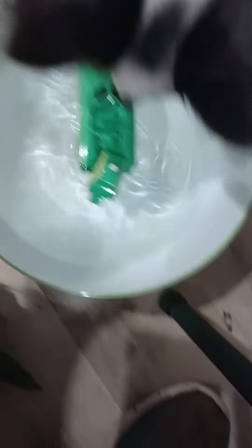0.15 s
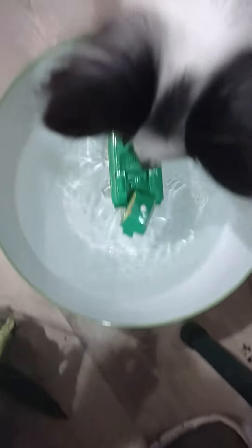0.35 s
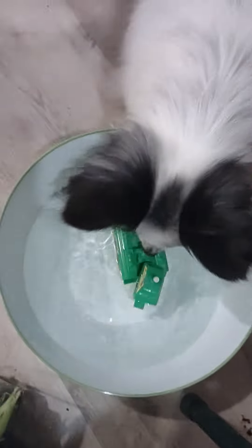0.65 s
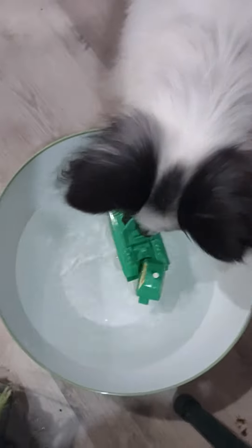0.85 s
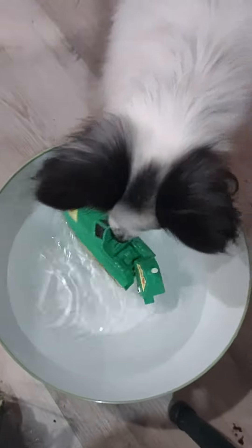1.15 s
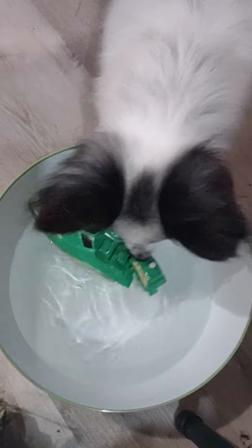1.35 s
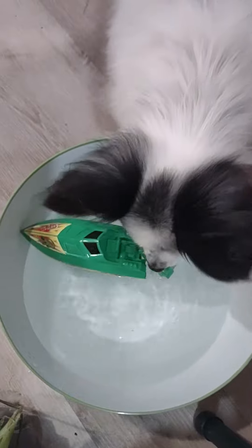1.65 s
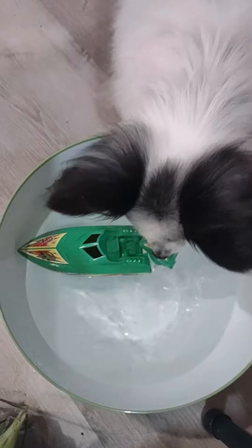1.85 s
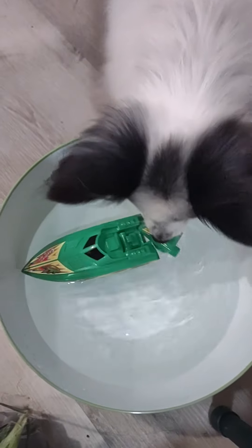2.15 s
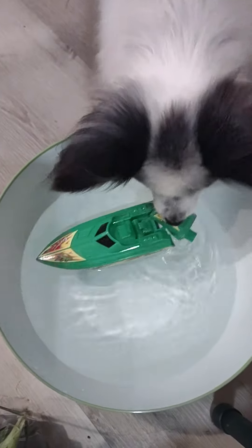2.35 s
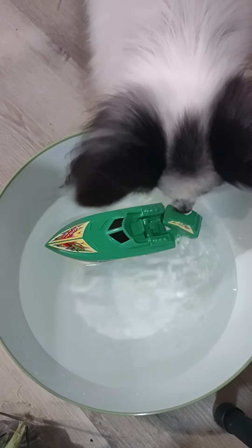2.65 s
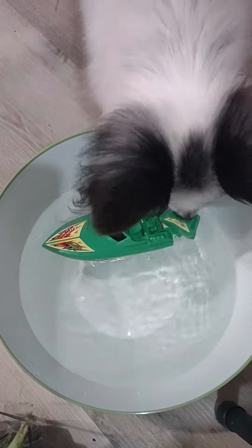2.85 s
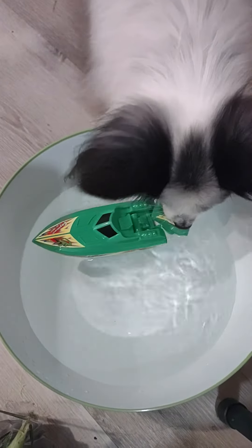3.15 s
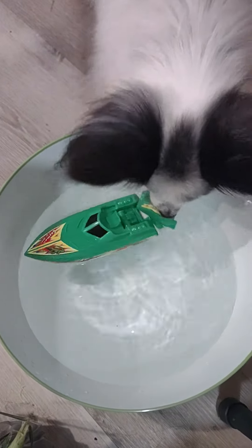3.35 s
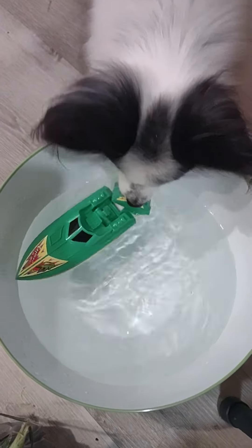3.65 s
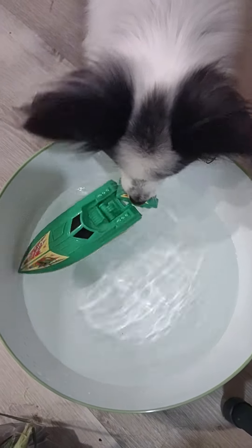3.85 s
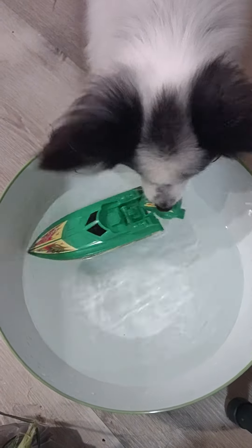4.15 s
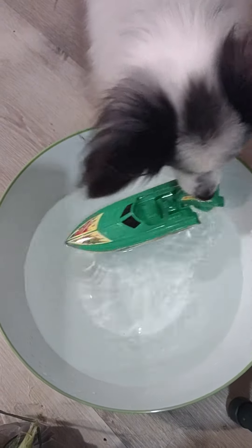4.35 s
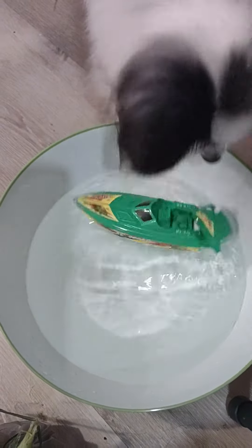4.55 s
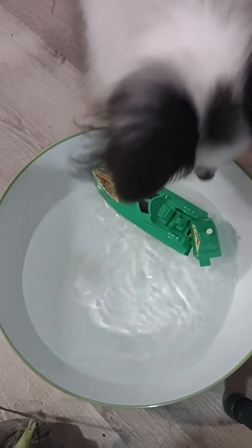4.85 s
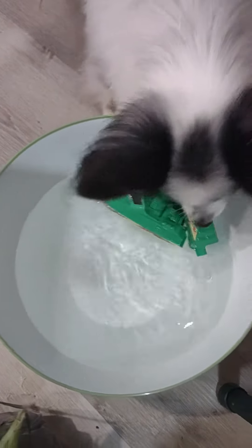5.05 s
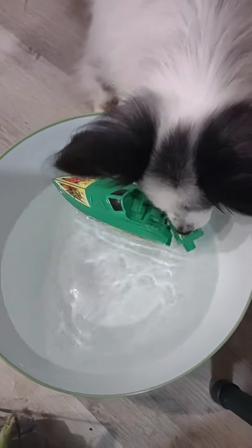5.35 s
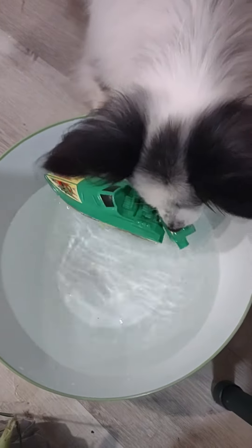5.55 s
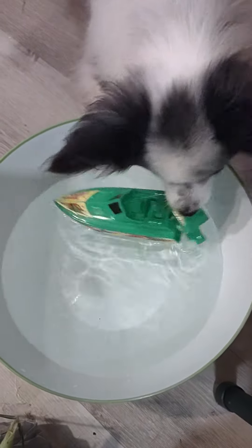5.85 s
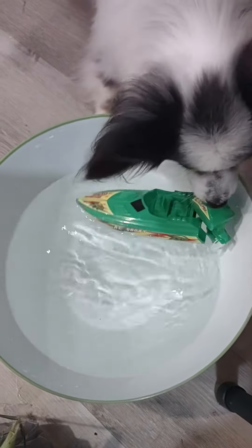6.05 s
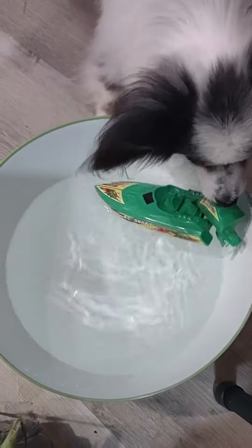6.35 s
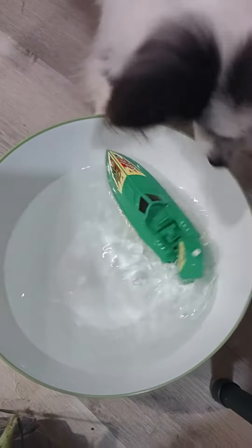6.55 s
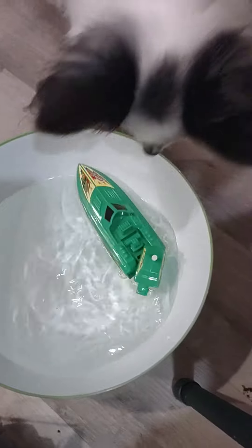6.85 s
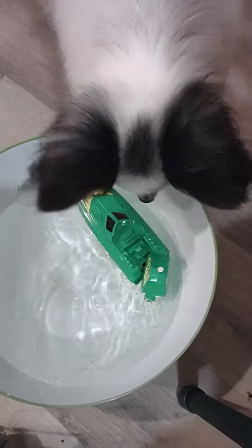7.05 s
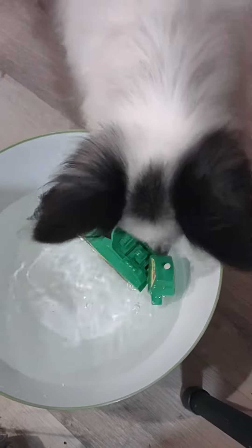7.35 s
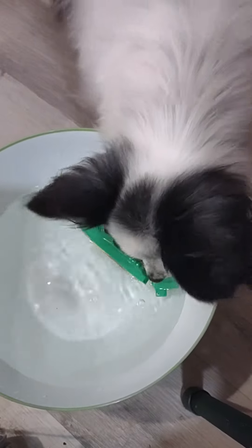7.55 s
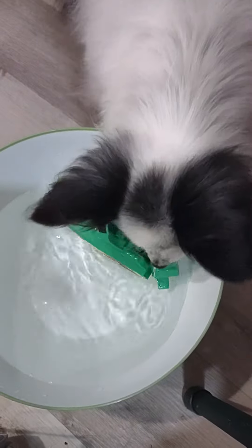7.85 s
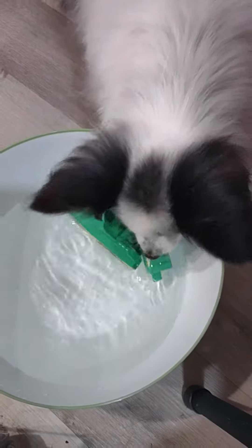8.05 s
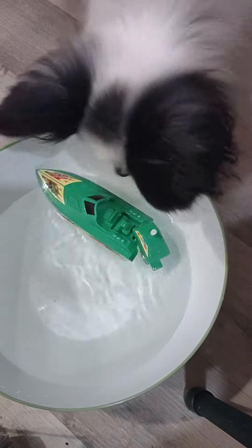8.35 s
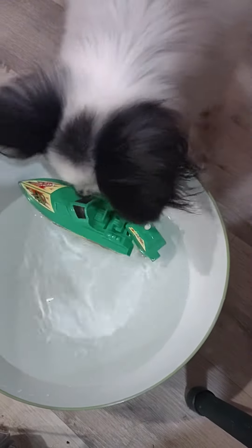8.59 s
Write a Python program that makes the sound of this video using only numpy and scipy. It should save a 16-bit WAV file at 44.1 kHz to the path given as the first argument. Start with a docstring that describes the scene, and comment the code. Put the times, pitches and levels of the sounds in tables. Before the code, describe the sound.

A wind-up plastic toy boat whirs and rattles in a bowl of water, its gears slowing under a puppy's mouth, after early microphone bumps.

```python
"""Touches brush and bump a microphone in the first seconds, over the whir of a wind-up plastic boat in a bowl indoors.
A puppy noses the boat and stalls the clockwork now and then: its gear ticks slow down and lose level.
Ticks and noise drive gear, gearbox and hull resonances; knocks of hull on bowl ring the same hull modes.
Plips and two short hull rings are sines rising in pitch; two faint ticks and a brief squeak are wavering tones.
Loud gear ticks and releases are noise rasps; brushing, hand rumble, a brief hiss and the floor are filtered noise."""
import sys
import numpy as np
from scipy import signal
from scipy.fft import rfft, irfft
from scipy.io import wavfile
from scipy.ndimage import uniform_filter1d

SR = 44100
rng = np.random.default_rng(int(sys.argv[2]) if len(sys.argv) > 2 else 0)


def digitize_waveform(pressure):
    """Quantize a signal to 16-bit integers and store it at the path in sys.argv[1].

    Rows of a 2-D input are taken as channels; values are limited to [-1, 1].
    """
    field = np.atleast_2d(pressure).T
    bounded = np.clip(field, -1, 1)
    quanta = np.round(bounded * 32767).astype(np.int16)
    wavfile.write(sys.argv[1], SR, quanta)


N = 384552
TIME = np.arange(N) / SR

# Hull modes. Each row: frequency in Hz, relative level in dB, t60 in s.
HULL = [(353, -10.5, 0.15), (387.8, -11.5, 0.12), (566.5, -10.5, 0.038), (686, -7.5, 0.022),
        (805, -7.5, 0.036), (928, -3, 0.041), (1008, -2, 0.036), (1114, -5.5, 0.07), (1457, -16, 0.05),
        (1620, -28, 0.21), (2010, -21, 0.069), (2674, -2, 0.0048), (3242, -0.5, 0.035), (3677, -5.5, 0.049)]


def from_db(db):
    """Decibels to gain."""
    return 10 ** (np.asarray(db) / 20)


def rms_one(x):
    """Scale to unit rms."""
    return x / np.sqrt(np.mean(x ** 2) + 1e-20)


def noise(size=N):
    """White Gaussian noise of unit spread."""
    return rng.standard_normal(size)


def in_time(rows):
    """Interpolate each column of a curve to one value per sample."""
    s, *columns = np.transpose(rows)
    return [np.interp(TIME, s, column) for column in columns]


def drift(knots_per_s):
    """Random curve of unit rms, linear between knots."""
    knots = noise(N // 100)
    return rms_one(np.interp(TIME * knots_per_s, np.arange(len(knots)), knots))


def swell_at(s, length_s):
    """Cosine-squared rise and fall of height 1, centred on time s."""
    return np.cos(np.pi * np.clip((TIME - s) / length_s, -.5, .5)) ** 2


def decay(t, t60_s):
    """Exponential fall by 60 dB in t60_s."""
    return np.exp(-np.log(1000) * t / t60_s)


def cut(x, hz, kind, order=2):
    """Butterworth filter."""
    return signal.sosfilt(signal.butter(order, hz, kind, fs=SR, output="sos"), x + 1e-18)


def colour(x, spectrum):
    """Minimum-phase filter with the given spectrum, built by folding the cepstrum."""
    hz, db = np.transpose(spectrum)
    size = 2048
    grid_hz = np.maximum(np.fft.rfftfreq(size, 1 / SR), 1)
    grid_db = np.interp(np.log(grid_hz), np.log(hz), db)
    cepstrum = irfft(np.log(from_db(grid_db)))
    cepstrum[1:size // 2] *= 2
    cepstrum[size // 2 + 1:] = 0
    impulse = irfft(np.exp(rfft(cepstrum)))
    return signal.oaconvolve(x, impulse)[:N]


def ring(x, hz, t60_s):
    """Two-pole resonator: a unit click starts a decaying sine of height 1."""
    radius = from_db(-60 / (t60_s * SR))
    angle = 2 * np.pi * hz / SR
    return signal.lfilter([0, np.sin(angle)], [1, -2 * radius * np.cos(angle), radius * radius], x + 1e-18)


def die_away(x, t60_s):
    """One-pole decay: each click becomes a falling envelope."""
    return signal.lfilter([1], [1, -from_db(-60 / (t60_s * SR))], x + 1e-18)


def clicks_at(s, sizes):
    """Single-sample clicks at the given times."""
    out = np.zeros(N)
    np.add.at(out, np.round(np.asarray(s) * SR).astype(int), sizes)
    return out


def add(out, s, sound):
    """Mix a short sound in at time s."""
    start = round(s * SR)
    out[start:start + len(sound)] += sound[:N - start]


def room_floor():
    """Steady indoor background: noise shaped to a falling spectrum."""
    # Floor spectrum. Each row: frequency in Hz, relative density in dB per Hz.
    floor_spectrum = [(15, -49.5), (25, -14.5), (179, -7), (371, -15), (439, -6.5), (560, -20.5),
                      (633, -12), (847, -22), (1080, -12.5), (1340, -39), (2240, -26), (8310, -37),
                      (10800, -77.5), (18300, -120)]
    level_db = -67
    return from_db(level_db) * rms_one(colour(noise(), floor_spectrum))


def hiss():
    """Short, smooth swell of shaped noise."""
    # Hiss spectrum. Each row: frequency in Hz, relative density in dB per Hz.
    hiss_spectrum = [(1400, -28), (2300, 2), (3000, 1.5), (4000, -3.5), (8000, -4.5)]
    centre_s, length_s, level_db = 3.25, 0.56, -46
    return from_db(level_db) * swell_at(centre_s, length_s) * rms_one(colour(noise(), hiss_spectrum))


def brushing(lumpy_db=4.0, spread=1.96, dull_hz=1285.0):
    """Dull, lumpy strokes of friction close to the microphone, over the rumble of the moving hand."""
    # Hand movements. Each row: middle in seconds, length in s, level in dB.
    hand_moves = [(0.092, 3.3, -61.5), (1.437, 2.38, -54), (2.877, 3.1, -67.5), (5.064, 0.6, -65),
                  (6.748, 0.51, -62.5)]
    # Rumble spectrum. Each row: frequency in Hz, relative density in dB per Hz.
    rumble_spectrum = [(15, -23.5), (30, -13.5), (80, -5.5), (180, -11.5), (500, -18.5), (1500, -30.5)]
    # Strokes. Each row: middle in seconds, length in s, level in dB before the fade, centre in Hz.
    strokes = [(0.132, 0.24, -55, 304), (0.615, 0.12, -47, 377), (0.764, 0.11, -41.5, 617),
               (0.81, 0.24, -54.5, 283), (0.877, 0.059, -44, 507), (0.986, 0.15, -52.5, 410),
               (1.289, 0.22, -49.5, 356), (1.602, 0.14, -52, 750), (1.868, 0.13, -44.5, 1270),
               (2.045, 0.017, -41, 900), (2.085, 0.25, -45, 580), (2.285, 0.45, -56, 500),
               (2.513, 0.05, -50.5, 637)]
    moving = sum(from_db(db) * swell_at(s, length_s) for s, length_s, db in hand_moves)
    out = moving * rms_one(colour(noise(), rumble_spectrum))
    grain = cut(noise() * from_db(lumpy_db * drift(160)), dull_hz, "low", order=3)
    for s, length_s, db, hz in strokes:
        start = max(round((s - length_s / 2) * SR), 0)
        size = int(length_s * SR)
        stroke = rms_one(cut(grain[start:start + size], [hz / spread, hz * spread], "band"))
        add(out, start / SR, from_db(db) * np.hanning(size) * stroke)
    return out


def bumps():
    """A touch on the microphone: round pop with a sharper tip, scuff and crack around it, low thud after it."""
    # Touches. Each row: time in seconds, overall gain in dB, pop frequency in Hz.
    touches = [(0.113, -44, 576), (0.124, -36, 355), (0.513, -33.5, 260), (0.65, -31, 435),
               (0.692, -36, 990), (0.773, -21.5, 442), (0.881, -25.5, 390), (0.9125, -12.5, 375),
               (0.990, -27, 590), (1.17, -33, 490), (1.235, -38, 294), (1.25, -29.5, 400),
               (1.269, -31, 397), (1.517, -25.5, 526), (1.629, -17, 577), (1.799, -25.5, 930),
               (1.82, -22, 860), (1.841, -32, 750), (1.855, -15.5, 670), (1.880, -11.5, 800),
               (2.0504, -21, 670), (2.058, -22, 490), (2.1029, -3, 420), (2.141, -22, 510),
               (2.511, -37, 400)]
    pop_width_cycles, pop_db = 0.4, -3.5
    tip_ratio, tip_db = 2.17, -12.5
    thud_delay_s, thud_hz, thud_t60_s = 0.00553, 94.0, 0.022
    boom_hz, boom_t60_s, boom_db = 164.0, 0.014, -4.0
    soft_pop_hz = 441
    # levels at or below soft_pop_hz, then change per octave above it
    thud_db, thud_db_per_octave = -2.5, -31
    scuff_db, scuff_db_per_octave = -21.5, 6
    crack_db, crack_db_per_octave = -31.5, 17.5

    out, lead_s = np.zeros(N), .02
    t = TIME[:SR // 5] - lead_s
    strike = -clicks_at([lead_s + thud_delay_s], [1])[:len(t)]
    thud = ring(strike, thud_hz, thud_t60_s) - from_db(boom_db) * ring(strike, boom_hz, boom_t60_s)
    for s, touch_db, hz in touches:
        octaves = max(np.log2(hz / soft_pop_hz), 0)
        tip_hz = hz * tip_ratio
        pop = np.exp(-(t * hz / pop_width_cycles) ** 2) * np.cos(2 * np.pi * hz * t)
        tip = np.exp(-(t * tip_hz / pop_width_cycles) ** 2) * np.sin(2 * np.pi * tip_hz * t)
        scuff_noise = rms_one(cut(noise(len(t)), [hz / 2, hz * 1.24], "band", order=3))
        scuff = np.exp(-abs(t) / 0.0038) * scuff_noise
        crack_noise = rms_one(cut(noise(len(t)), [1800, 3800], "band", order=1))
        crack = np.exp(-abs(t) / 0.0011) * crack_noise
        touch = from_db(pop_db) * pop + from_db(tip_db) * tip
        touch += from_db(scuff_db + scuff_db_per_octave * octaves) * scuff
        touch += from_db(thud_db + thud_db_per_octave * octaves) * thud
        touch += from_db(crack_db + crack_db_per_octave * octaves) * crack
        add(out, s - lead_s, from_db(touch_db) * touch)
    return cut(out, 68, "high")


def wavering_tones(waver=0.04):
    """Short wavering tones with their octave: two faint ticks, then a brief squeak."""
    # Tones. Each row: start in seconds, length in s, level in dB, mean frequency in Hz.
    tones = [(0.2, 0.021, -51, 2120), (1.151, 0.013, -51.5, 2090), (6.58, 0.0065, -48, 4350),
             (6.582, 0.022, -58, 2520), (6.594, 0.013, -60, 4160)]
    out = np.zeros(N)
    for s, length_s, db, hz in tones:
        size = int(length_s * SR)
        phase = 2 * np.pi * np.cumsum(hz * (1 + waver * drift(250)[:size])) / SR
        tone = np.sin(phase) + .5 * np.sin(2 * phase)
        add(out, s, from_db(db) * np.hanning(size) * tone)
    return out


def plips_and_rings(t60_s=0.068, attack_s=0.0053, rise_per_s=2.4, churn_db=-75.5, count=130):
    """Sines rising in pitch: water plips, two short hull rings, many small bubbles stirred by the screw."""
    # Plips, and two short hull rings near 340 Hz (the last two rows). Each row: start in seconds,
    # level in dB before the envelope, starting frequency in Hz.
    plips = [(3.085, -40.5, 316), (3.265, -44.5, 212.1), (3.385, -39, 357), (5.195, -43, 355),
             (6.606, -42.5, 663), (8.085, -45, 342.2), (8.16, -41, 329.6)]
    out, t = np.zeros(N), TIME[:SR // 5]
    stirring = from_db(-braking())
    tones = list(plips)
    for when, strength, pitch in rng.random((count, 3)):
        if stirring[int(when * N)] > .5:   # no small bubbles while the screw is held
            tones.append((when * TIME[-1], churn_db + 16.4 * strength, 300.0 * 3.5 ** pitch))
    envelope = (1 - np.exp(-t / attack_s)) * decay(t, t60_s)
    for s, db, hz in tones:
        add(out, s, from_db(db) * envelope * np.sin(2 * np.pi * hz * t * (1 + rise_per_s * t)))
    return out


def knocks():
    """Hull against bowl: each knock cracks, clacks at its own pitch, chatters and rings the hull modes."""
    # Knocks. Each row: start in seconds, knock level in dB, low hull ring in dB (depends on where it
    # is hit), clack in Hz. Levels are ahead of the part gains below.
    blows_on_bowl = [(0.293, -29, -21, 907), (2.647, -40, -25, 697), (3.367, -36, -30, 954),
                     (3.697, -39.5, -32, 949.3), (4.053, -38.5, -32, 900), (4.543, -28.5, -22, 900),
                     (4.8942, -18.5, -15.5, 928.4), (5.166, -40.5, -40, 745), (5.516, -39, -33, 860),
                     (5.732, -28.5, -30.5, 800.5), (6.036, -32.5, -34.5, 916), (6.138, -38.5, -43, 960),
                     (6.478, -41.5, -41, 890), (6.647, -38, -43, 712), (6.7688, -21, -20, 945),
                     (7.83, -39, -38, 902.2), (7.971, -39, -33, 906), (8.06, -38, -28.5, 900),
                     (8.255, -30, -31, 861.4)]
    ring_db, low_ring_top_hz = -10.0, 450
    chatter, chatter_t60_s = 0.043, 0.1
    clack_db, clack_t60_s, clack_spread = -13.0, 0.048, 1.3
    crack_db, crack_t60_s = -10.5, 0.095
    crack_growth = 1.43   # dB of crack per dB of knock: harder is brighter

    s, body_db, low_db, clack_hz = np.transpose(blows_on_bowl)
    chatter_noise = chatter * noise()
    out = 0
    for k, (hz, db, t60_s) in enumerate(HULL):
        blow_db = low_db if hz < low_ring_top_hz else body_db
        blows = clicks_at(s, from_db(blow_db + rng.normal(0, 1.0, len(s))))
        drive = blows + chatter_noise * die_away(blows, chatter_t60_s)
        out = out + (-1) ** k * from_db(db + ring_db) * ring(drive, hz, t60_s)
    out = cut(out, [330, 1800], "band", order=3)   # soft wet contact, no bass from a small hull
    t = TIME[:SR // 5]
    for start, db, hz in zip(s, body_db, clack_hz):
        band = cut(noise(2 * len(t)), [hz / clack_spread, hz * clack_spread], "band", order=6)
        clack = rms_one(band[len(t):])   # first half is filter run-in
        add(out, start, from_db(db + clack_db) * decay(t, clack_t60_s) * clack)
    crack_envelope = die_away(clicks_at(s, from_db(crack_growth * body_db)), crack_t60_s)
    crack = crack_envelope * rms_one(cut(noise(), [2700, 6000], "band"))
    return out + from_db(crack_db) * crack


def loud_gear_ticks(t60_s=0.021, rise_s=0.0035, level_db=-4.5, ping_db=-0.5):
    """Loud single gear ticks and releases, each a bright rasp with its own pitch."""
    # Ticks and releases. Each row: start in seconds, level in dB ahead of level_db, ping in Hz.
    rasps = [(2.2632, -37, 5000), (2.2863, -37, 4900), (2.6452, -33, 4340), (2.711, -33, 7530),
             (2.7658, -27.5, 5500), (3.702, -32, 3800), (3.8412, -36, 4500), (3.903, -36, 4510),
             (4.0059, -34, 5010), (4.0198, -37, 4020), (4.1754, -48, 5660), (4.2298, -51, 7406),
             (4.2971, -42, 7500), (4.336, -37, 5940), (4.375, -42, 5836), (4.4623, -29.5, 4540),
             (4.4955, -32, 5564), (4.5186, -30, 5686), (4.553, -22, 6200), (4.6489, -42, 4800),
             (6.039, -35.5, 5850), (6.4767, -33, 3850), (6.647, -37, 5870)]
    out, t = np.zeros(N), TIME[:SR // 20]
    envelope = (1 - np.exp(-t / rise_s)) * decay(t, t60_s)
    for s, db, hz in rasps:
        rasp = rms_one(cut(noise(len(t)), [3500, 7000], "band"))
        ping = rms_one(ring(rasp, hz, t60_s=0.024))
        add(out, s, from_db(db + level_db) * envelope * (rasp + from_db(ping_db) * ping))
    return out


def braking(grip_db_per_s=230.0):
    """Decibels lost to the puppy's grip on the screw: it tightens steadily, holds, then lets go."""
    # Stalls. Each row: start in seconds, time to release in s, whir lost in dB, recovery in s.
    stalls = [(2.377, 0.28, 23, 0.0063), (3.85, 0.045, 8, 0.087), (4.111, 0.16, 15, 0.12),
              (4.461, 0.063, 13, 0.017), (4.63, 0.049, 13, 0.038), (5.852, 0.615, 28.5, 0.0075),
              (6.507, 0.19, 10.5, 0.23), (7.63, 0.11, 13, 0.055)]
    lost_db = np.zeros(N)
    for s, length_s, depth_db, recovery_s in stalls:
        grip_db = np.clip((TIME - s) * grip_db_per_s, 0, depth_db)
        lost_db += grip_db * np.clip(1 - (TIME - s - length_s) / recovery_s, 0, 1)
    return lost_db


def tick_rate(lost_db, half_speed_db=18.0):
    """Ticks per second under the changing load; braking by half_speed_db halves the rate."""
    # Clockwork speed before braking. Each row: time in seconds, ticks per s.
    running_speed = [(0.1, 127), (1.7, 113), (2.05, 107.5), (2.33, 79.4), (2.75, 82), (3.0, 99.4),
                     (3.4, 98.7), (3.65, 81.4), (4.1, 67.4), (4.45, 75), (5.05, 86), (5.75, 79),
                     (6.95, 69.4), (7.15, 84), (7.4, 86), (7.7, 68.4), (8.6, 83.6)]
    free_per_s, = in_time(running_speed)
    return free_per_s * .5 ** (lost_db / half_speed_db)


def tooth_ticks(per_s, jitter, uneven_db):
    """One click per gear tooth, uneven in time and strength."""
    turns = np.cumsum(per_s * np.exp(jitter * drift(60))) / SR
    teeth = np.diff(np.floor(turns), prepend=0)
    return teeth * from_db(uneven_db * np.clip(noise(), -2, 1))


def rattle_of(ticks, t60_s, swing_per_s=70.0, count=8):
    """Ticks ring fixed dense plastic responses, one per side; the side that radiates keeps changing."""
    t = TIME[:SR // 30]
    sides = noise((count, len(t))) * decay(t, t60_s)
    facing = from_db(10 * np.array([drift(swing_per_s) for _ in sides]))
    facing /= np.linalg.norm(facing, axis=0)
    out = 0
    for share, side in zip(facing, sides):
        out = out + share * rms_one(signal.oaconvolve(ticks, side)[:N])
    return rms_one(out)


def moving_ring(x, hz, t60_s):
    """Resonance with a moving centre: shift down to 0 Hz, decay, shift back up."""
    turn = np.exp(2j * np.pi * np.cumsum(hz) / SR)
    return rms_one(np.real(die_away(x / turn, t60_s) * turn))


def gearbox(rattle, t60_s=.012):
    """Broad resonances that shift a little, swell and fade at random."""
    # Gearbox resonances. Each row: mean frequency in Hz, mean relative level in dB.
    resonances = [(2960, 2), (3520, 3), (3790, 2), (4540, -1), (5000, -7.5), (5700, -5), (6420, -3.5),
                  (7400, -4.5)]
    out = 0
    for hz, db in resonances:
        centre_hz = hz * (1 + .02 * drift(6))
        swell_db = 2.6 * drift(11)
        out = out + from_db(db + swell_db) * moving_ring(rattle, centre_hz, t60_s)
    return rms_one(cut(out, 2457, "high", order=4))


def flares(rattle, half_width_hz=200.0):
    """Fixed-pitch bands of the rattle swell and fade, often overlapping, as the boat turns and dips."""
    # Flares. Each row: middle in seconds, length in s, frequency in Hz, level in dB re whir.
    bands = [(0.18, 0.66, 3550, -2), (0.253, 0.77, 5520, -6.5), (0.848, 0.77, 3540, -9.5),
             (1.68, 0.6, 5720, -9), (1.596, 1.3, 6680, -14), (1.954, 0.78, 4570, -11),
             (2.3, 0.42, 4960, -4.5), (2.325, 0.25, 5790, -8), (2.804, 0.3, 5730, -9),
             (3.7, 2.64, 1463, -15.5), (3.795, 1.04, 3930, -10.5), (4.426, 0.28, 5860, -2.5),
             (5.09, 1.2, 3480, -9), (7.151, 1.18, 3703, -5), (7.202, 1.223, 4690, -5),
             (7.281, 0.21, 7040, -6), (8.3, 2.1, 4457, -7), (8.401, 0.95, 3560, -8.5)]
    out = 0
    for s, length_s, hz, db in bands:
        band = rms_one(cut(rattle, [hz - half_width_hz, hz + half_width_hz], "band"))
        out = out + from_db(db) * swell_at(s, length_s) * band
    return out


def clockwork():
    """A slow and a fast gear tick in the gearbox; the plastic hull adds its hollow ring."""
    # Free-running boat pushed about the bowl. Each row: time in seconds, whir in dB,
    # hollow hull ring in dB re whir, gain of the top treble in dB.
    boat_levels = [(0.15, -49.5, -13.5, -7.5), (0.45, -50, -17.5, -9.5), (0.75, -46.5, -14.5, -11.5),
                   (1.3, -51, -18.5, -13.5), (1.8, -47.5, -8.5, -12.5), (2.35, -53, -6.5, -6.5),
                   (2.75, -58, -2.5, -0.5), (3.3, -55.5, -2, 7.5), (3.9, -54, -9, -2.5),
                   (4.45, -52, -11.5, -7.5), (5.0, -50.5, -12.5, -7.5), (5.4, -53.5, -11.5, -8.5),
                   (7.05, -55.5, -7.5, -4), (7.6, -58, -10.5, -1), (8.0, -52, -8, -11.5),
                   (8.6, -56.5, -15, -2)]
    # Gear noise spectrum. Each row: frequency in Hz, relative density in dB per Hz.
    gear_spectrum = [(1200, -19.5), (1500, -6), (1850, -11), (2400, -6.5), (2900, 7), (3150, -3.5),
                     (3600, -5.5), (4100, -6.5), (4600, -3), (5300, 0.5), (6200, -2), (7500, 0),
                     (8300, -11)]
    mesh_ratio, mesh_db = 2.0, -1.0   # fast gear re slow gear
    rush_db, rush_ref_per_s, rush_db_per_doubling = -2.0, 101.6, 14.0
    jerk_db, gears_db, box_db = 2.23, -5.5, -3.0
    treble_hz, shake_low_hz, shake_top_hz = 5200, 440, 2680.0
    hull_brake_share = 0.47   # the hollow ring loses only this share of the whir's drop

    free_db, hollow_db, top_db = in_time(boat_levels)
    lost_db = braking()
    per_s = tick_rate(lost_db)
    slow = rattle_of(tooth_ticks(per_s, jitter=.07, uneven_db=4.0), t60_s=.018)
    fast = rattle_of(tooth_ticks(per_s * mesh_ratio, jitter=.06, uneven_db=3.0), t60_s=.014)
    # fast ticks blur into a rush, slow ones stand apart
    rush = from_db(rush_db + rush_db_per_doubling * np.log2(per_s / rush_ref_per_s)) * noise()
    rattle = slow + from_db(mesh_db) * fast + rush
    rattle = rattle / np.sqrt(uniform_filter1d(rattle ** 2, size=SR // 8) + 1e-12)   # even spring drive
    rattle = rattle * from_db(jerk_db * np.minimum(drift(35), 1))   # spring unwinds in small jerks

    gears = from_db(gears_db) * rms_one(colour(rattle, gear_spectrum))
    gears = gears + from_db(box_db) * gearbox(rattle)
    # forward and backward passes keep the treble in phase
    treble = cut(cut(gears, treble_hz, "high")[::-1], treble_hz, "high")[::-1]
    whir = gears + (from_db(top_db) - 1) * treble + flares(rattle)

    shake = cut(rattle * noise(), shake_low_hz, "high", order=1)   # small gears hardly move the lowest mode
    shake = cut(shake, shake_top_hz, "low", order=3)   # the hollow ring is kept below the treble
    body = 0
    for k, (hz, db, t60_s) in enumerate(HULL):
        body = body + (-1) ** k * from_db(db) * ring(shake, hz, t60_s)
    body_db = free_db + hollow_db - hull_brake_share * lost_db
    return from_db(free_db - lost_db) * whir + from_db(body_db) * rms_one(body)


def room(x, t60_s=0.26, wet_db=-9.5):
    """Short diffuse tail from floor and walls: decaying noise after a 4 ms gap."""
    t = TIME[:SR // 2]
    tail = noise(len(t)) * decay(t, t60_s) * (t > .004)
    return x + from_db(wet_db) * signal.oaconvolve(x, tail / np.linalg.norm(tail))[:N]


def scene():
    """The boat in the room, with the touches on the microphone dry in front."""
    boat = room(hiss() + wavering_tones() + plips_and_rings() + knocks() + loud_gear_ticks() + clockwork())
    return (room_floor() + brushing() + bumps() + boat)[None]


def record(dry):
    """The top rolls off, then is cut steeply."""
    roll_off_hz, cutoff_hz = 7800, 8200
    soft = cut(dry, roll_off_hz, "low", order=16)
    steep = signal.ellip(10, .2, 70, cutoff_hz, fs=SR, output="sos")
    return signal.sosfilt(steep, soft)


dry = scene()
out = record(dry)
digitize_waveform(out)
```